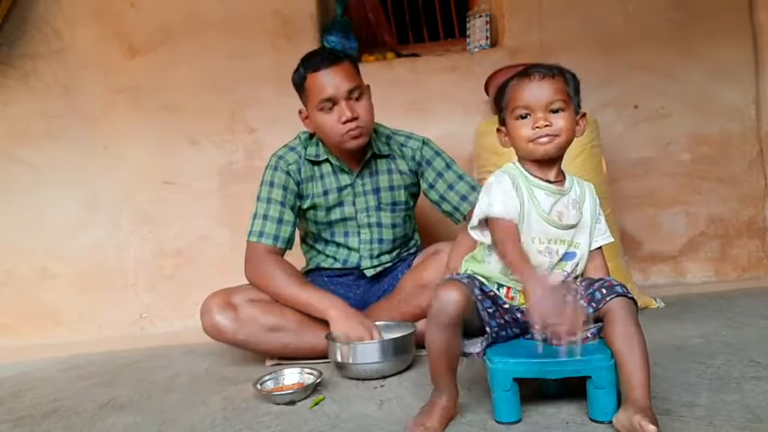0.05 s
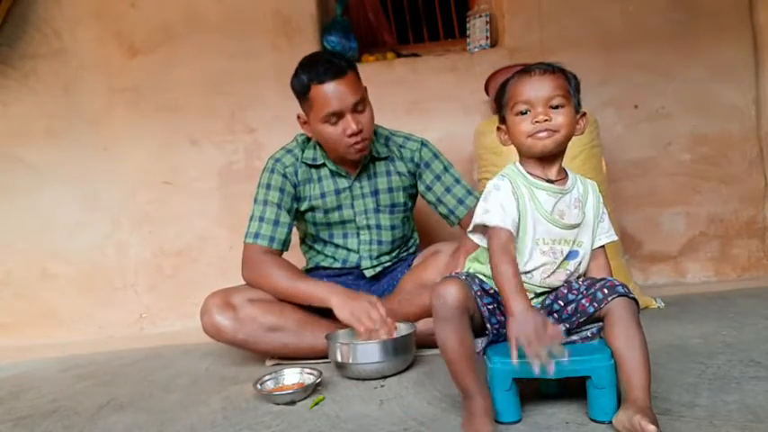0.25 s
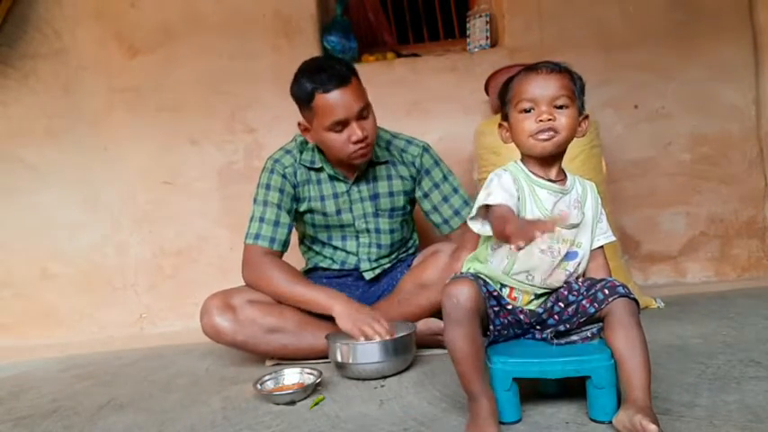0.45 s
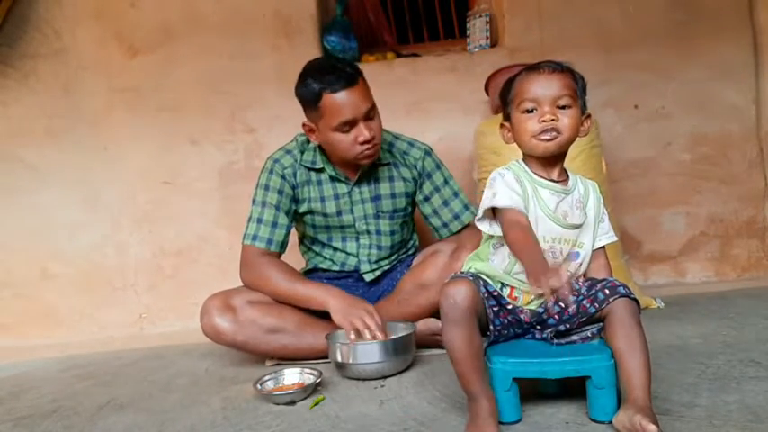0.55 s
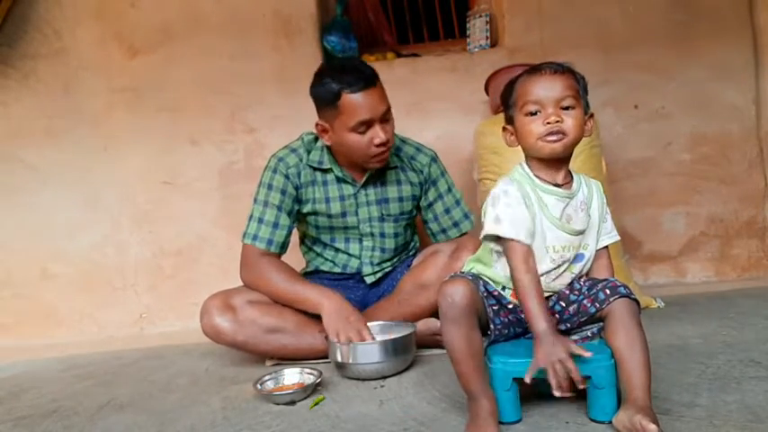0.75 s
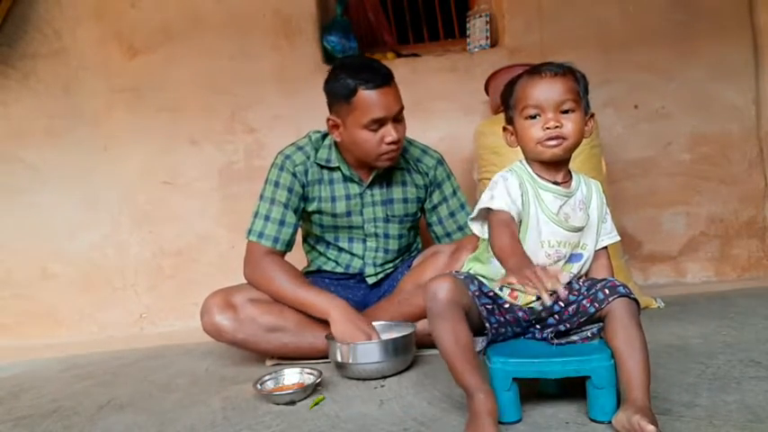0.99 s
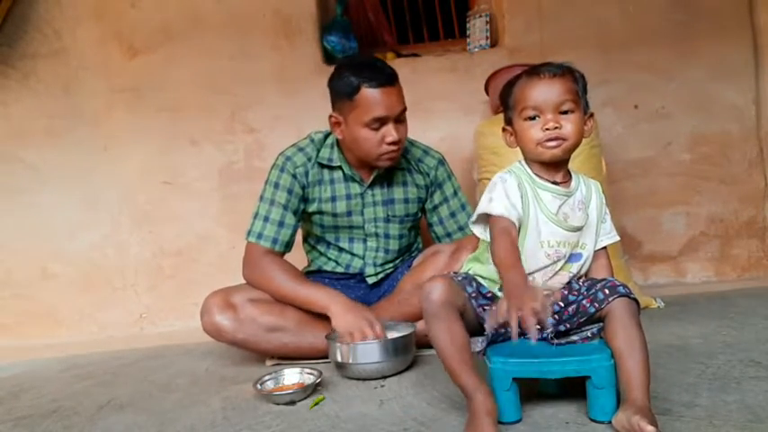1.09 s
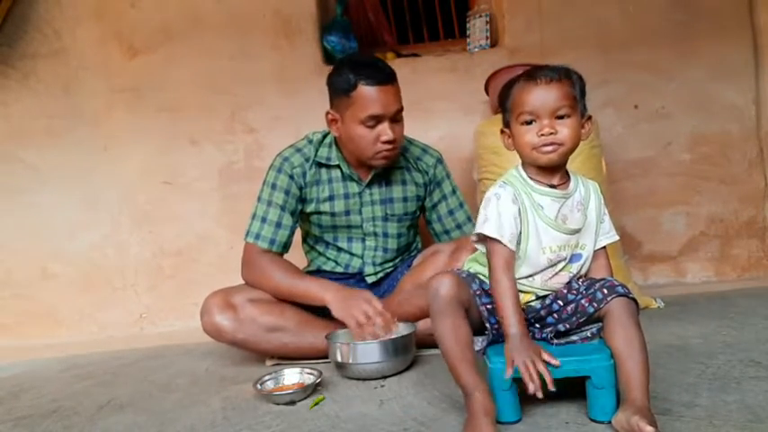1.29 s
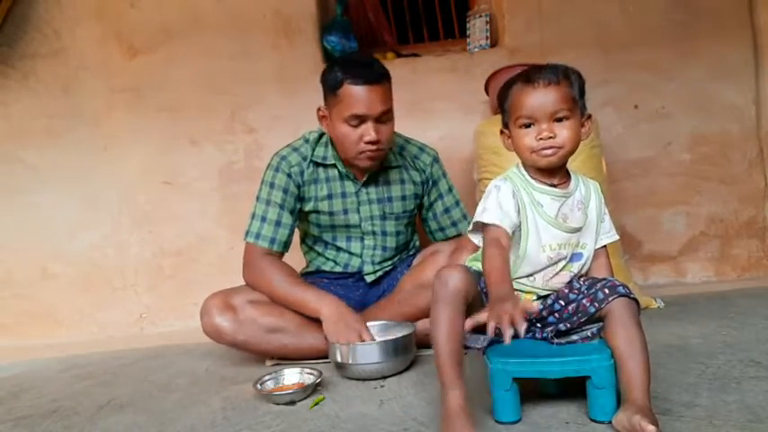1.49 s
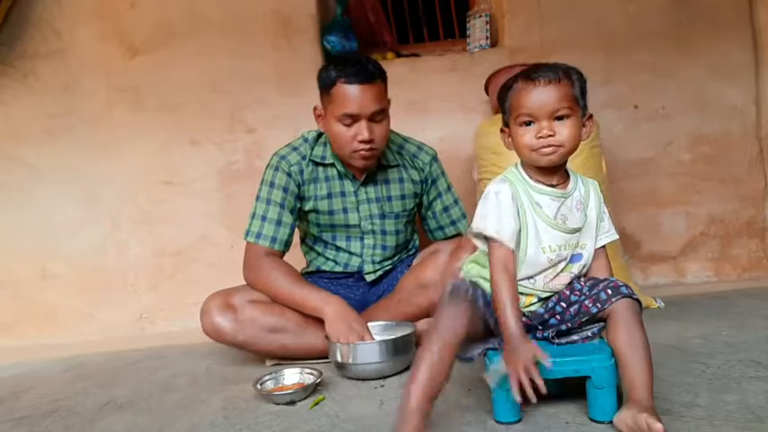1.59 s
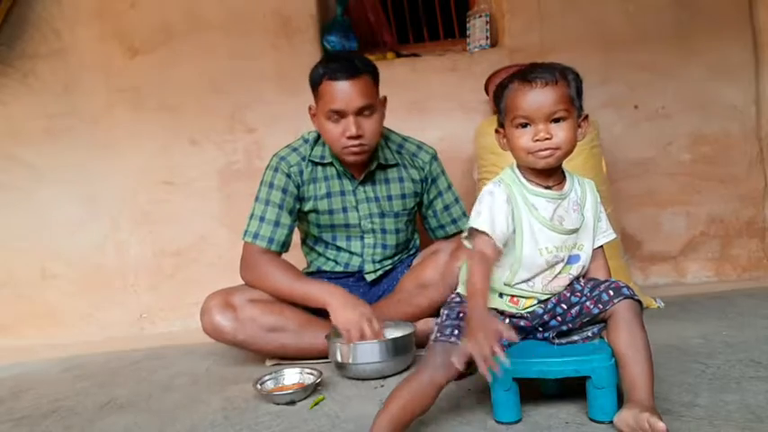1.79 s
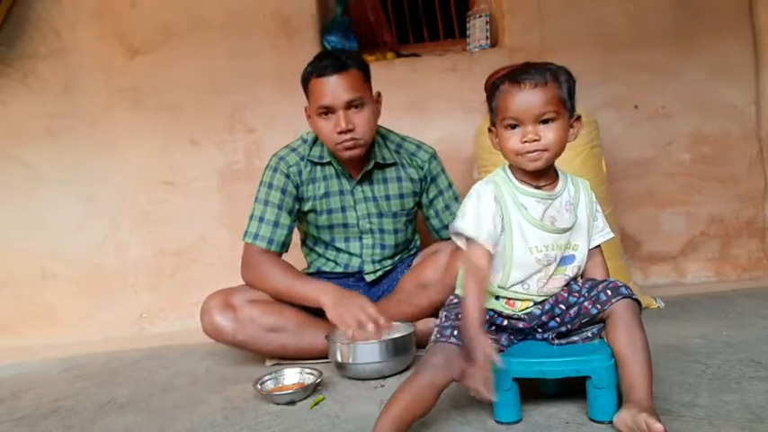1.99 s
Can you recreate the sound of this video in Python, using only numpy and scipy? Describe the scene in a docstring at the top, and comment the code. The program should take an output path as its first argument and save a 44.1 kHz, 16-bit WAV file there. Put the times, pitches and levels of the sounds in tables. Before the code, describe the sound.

Wet rice squishes and rustles as a hand works it in a metal bowl, close by in a quiet room. One sharp, hollow slap comes first, then lighter thumps, ending with a brief hissing wipe and tiny pops.

```python
"""A hand mashes soaked rice in a metal bowl. A dull shuffle leads into a hollow thump with a sharp slap,
and wet grains swish and squelch under the fingers. More thumps follow about twice a second, from the
hand pushing into the bowl or a child patting a plastic stool beside it; grains rustle in between.
Near the end come a quick bright wipe, another shuffle and a few popping air pockets.
Throughout, a bare wall and floor answer briefly over a low room rumble."""
import sys
import numpy as np
from scipy import signal
from scipy.fft import rfft, irfft, next_fast_len
from scipy.io import wavfile

SR = 44100
rng = np.random.default_rng(int(sys.argv[2]) if len(sys.argv) > 2 else 0)


def int16_out(signal):
    """Quantize to a 16-bit WAV file."""
    q = np.round(np.clip(np.atleast_2d(signal).T, -1, 1) * 32767)
    wavfile.write(sys.argv[1], SR, q.astype(np.int16))


N = 90404

# Soft blows. Each row: start in seconds, level in dB, favoured frequency in Hz,
# fall to either side in dB per octave squared, factor on the modes' decay times.
BLOWS = [(0.2453, -24.5, 437, 2, 1), (.779, -34, 500, 2.5, 0.65), (.7905, -31, 510, 5.5, 0.73),
         (1.073, -35, 320, 15.5, 0.7), (1.097, -47, 626, 8.5, 0.89), (1.3213, -28, 338, 1, 1),
         (1.5854, -30.5, 363, 18, 0.59), (1.612, -41.5, 686, 8.5, 0.78), (1.731, -35, 473, 11, 0.72),
         (1.745, -37, 305, -7.5, 0.38), (1.796, -43.5, 196, 3.5, 0.96)]
# Modes of the hollow body. Each row: frequency in Hz, relative level in dB, base t60 in seconds.
BODY_MODES = [(180.8, -20, 0.36), (255.2, 0.5, 0.21), (287, -17, 0.11), (352.8, -4.5, 0.18),
              (393, -12.5, .05), (426.9, 2, 0.11), (476.8, -9.5, .26), (501, -2, 0.13), (543, -4, .165),
              (578.5, -9, 0.13), (653.5, -15.5, 0.13)]
def thumps():
    """Modal vibration: each blow rings the same damped modes, weighted by where it lands."""
    thud_db, thud_hz, thud_t60_s = -16, 104, 0.18
    scatter_db, detune_fraction = 2.05, 0.0035
    attack_s, cutoff_hz, left_lead_s = 0.0025, 740, 0.00018
    out = np.zeros(N)
    t = since(0)[:SR // 2]
    for start, db, centre_hz, fall_db, ring_factor in BLOWS:
        ring = amp(db + thud_db) * fade(t, thud_t60_s) * np.sin(2 * np.pi * thud_hz * t)
        for hz, mode_db, t60 in BODY_MODES:
            scatter, detune = rng.standard_normal(2)
            weight_db = mode_db - fall_db * np.log2(hz / centre_hz) ** 2
            mode = np.sin(2 * np.pi * hz * (1 + detune_fraction * detune) * t)
            ring += amp(db + weight_db + scatter_db * scatter) * fade(t, t60 * ring_factor) * mode
        out += np.pad(ring * rise(t, attack_s) ** 2, (round(start * SR), N))[:N]
    soft = filtered(out, lambda hz: 1 / np.sqrt(1 + (hz / cutoff_hz) ** 20))
    return filtered(soft, lambda hz: np.exp(2j * np.pi * np.outer([.5, -.5], hz) * left_lead_s))


# Skin impacts. Each row: start in seconds, clack level in dB, clack centre in Hz,
# clack half-width in octaves, snap level in dB, snap t60 in seconds.
SKIN_IMPACTS = [(0.2421, -35.5, 1417, .1, -32, 0.02), (0.7764, -52, 1480, 0.62, -53.5, 0.033),
                (0.79, -49, 880, 0.35, -52, 0.045), (1.078, -66.5, 1690, 0.27, -83, 0.11),
                (1.3197, -55, 1300, 0.72, -47.5, 0.041), (1.582, -54, 1570, 0.72, -66, 0.084),
                (1.7306, -47.5, 2000, 1, -45, .02)]
# Spectrum of the snap. Each row: frequency in Hz, relative level in dB.
SNAP_SPECTRUM = [(1000, -66), (2400, -41), (3100, 3.5), (4000, -3.5), (4900, 6.5), (6500, 1.5), (8400, -1),
                 (12000, -9.5), (15500, -23)]
# The snap's own panning. Each row: frequency in Hz, left minus right in dB.
SNAP_PAN = [(2000, -23), (5000, 4.5), (7000, -3), (9000, 1.5), (14000, 7)]
def slaps():
    """Impact noise: brief skin contact excites a broad band, a bright snap and a longer mid clack."""
    attack_s, clack_t60_ratio = 0.00076, 2.37
    out = np.zeros((2, N))
    snap_noise = panned(coloured(noise(), SNAP_SPECTRUM), SNAP_PAN)
    for start, clack_db, clack_hz, octaves, snap_db, t60 in SKIN_IMPACTS:
        t = since(start)
        clack_noise = unit(spread(filtered(noise(), band(clack_hz, octaves))))
        clack = amp(clack_db) * clack_noise * fade(t, t60 * clack_t60_ratio)
        snap = amp(snap_db) * snap_noise * fade(t, t60)
        out += rise(t, attack_s) * (clack + snap)
    return out


# Envelopes of the firm swish and the light rub. Each row: time in seconds, level in dB.
SWISH_ENVELOPE = [(0, -93.5), (.22, -77.5), (.25, -54), (.31, -52.5), (.36, -74.5), (.44, -80.5),
                  (.73, -84), (.76, -64.5), (.80, -62.5), (.85, -74), (1.0, -83), (1.3, -100),
                  (1.33, -61.5), (1.40, -72), (1.5, -87.5), (1.6, -73), (1.70, -74), (1.74, -56),
                  (1.78, -58.5), (1.815, -66.5), (1.855, -67.5), (1.91, -89.5), (2.05, -81)]
RUB_ENVELOPE = [(0, -74), (.05, -79), (.14, -88.5), (.23, -65.5), (.36, -64.5), (.45, -81), (.54, -66.5),
                (.6, -78), (.72, -75), (.92, -69.5), (1.08, -76), (1.2, -88.5), (1.5, -88), (1.58, -69.5),
                (1.69, -68.5), (1.82, -66), (1.9, -81), (1.98, -103.5), (2.02, -77)]
# Their spectra. Each row: frequency in Hz, relative level in dB.
SWISH_SPECTRUM = [(400, 0.5), (800, 1.5), (1500, 2.5), (2300, 2), (3200, 4.5), (5700, -6.5), (8500, -6),
                  (13700, -10.5), (15500, -18)]
RUB_SPECTRUM = [(1000, -28), (3800, -15), (5200, -6.5), (7200, -3.5), (8500, 2), (10000, -8.5), (13000, -7),
                (15500, -25)]
def stirring():
    """Granular friction: tiny slips sum to a coarse swish under pressure and a fine hiss in between."""
    swish = level(SWISH_ENVELOPE) * coloured(grains(per_s=4000), SWISH_SPECTRUM)
    rub = level(RUB_ENVELOPE) * coloured(grains(per_s=15000), RUB_SPECTRUM)
    return swish + rub


# Wet clumps parting. Each row: start in seconds, level in dB, length in seconds, centre in Hz.
PARTING_CLUMPS = [(0.256, -71, 0.016, 2800), (.291, -51, 0.018, 4700), (0.341, -56.5, 0.0076, 2160),
                  (0.499, -59, 0.01, 8300), (0.518, -59.5, .008, 7100), (0.737, -62, .005, 9900),
                  (0.7434, -51.5, 0.009, 8300), (0.751, -56, 0.029, 3750), (0.845, -62, 0.0057, 7600),
                  (1.324, -67, 0.022, 3680), (1.609, -63, 0.024, 2390), (1.821, -54, 0.014, 3520),
                  (1.84, -57.5, 0.017, 8200), (1.844, -54.5, 0.011, 4200)]
def squelches():
    """Capillary adhesion gives way: wet grains part in short crackling bursts."""
    out = np.zeros((2, N))
    for start, db, length, centre_hz in PARTING_CLUMPS:
        age = np.e * since(start) / length  # the burst peaks at age 1
        crackle = unit(filtered(grains(per_s=2500), band(centre_hz, octaves=0.74)))
        out += amp(db) * age * np.exp(1 - age) * crackle
    return out


# Air pockets in the rice. Each row: start in seconds, level in dB, frequency in Hz.
AIR_POCKETS = [(0.756, -48.5, 1490), (1.839, -54, 1840), (1.848, -43.5, 1510), (1.868, -62, 1130)]
def pops():
    """Cavity resonance: each air pocket rings as a damped sine when it opens."""
    out = np.zeros(N)
    for start, db, hz in AIR_POCKETS:
        t = since(start)
        out += amp(db) * np.sin(2 * np.pi * hz * t) * fade(t, t60=0.019) * rise(t, attack_s=0.00084)
    return out


# Spectrum of the wipe. Each row: frequency in Hz, relative level in dB.
WIPE_SPECTRUM = [(1500, -34), (3200, 2), (5500, -6), (7000, 0.5), (10000, -0.5), (13700, -2), (15500, -17)]
def wipe():
    """Sliding friction: one fast stroke of the hand hisses abruptly, holds and lets go."""
    start_s, attack_s, hold_s, level_db = 1.706, 0.012, 0.072, -56
    onset = np.minimum(since(start_s) / attack_s, 1)
    release = fade(since(start_s + attack_s + hold_s), t60=0.1)
    return amp(level_db) * onset * release * coloured(grains(per_s=4000), WIPE_SPECTRUM)


# Envelope of the hand's drag. Each row: time in seconds, level in dB.
DRAG_ENVELOPE = [(0, -77), (.07, -67), (.115, -56), (.165, -59), (.21, -64.5), (.3, -93), (1.6, -75.5),
                 (1.68, -63), (1.81, -49), (1.87, -79.5), (2.0, -85)]
# Its spectrum. Each row: frequency in Hz, relative level in dB.
DRAG_SPECTRUM = [(70, -20), (130, -2.5), (190, -4.5), (270, -2.5), (400, -13.5), (650, -31), (1200, -70),
                 (4000, -83)]
def shuffle():
    """Friction at a soft contact: the hand drags along the bowl and makes dull, low noise."""
    return level(DRAG_ENVELOPE) * coloured(noise(), DRAG_SPECTRUM)


# Reverberation times. Each row: frequency in Hz, t60 in seconds.
ROOM_T60 = [(100, 0.21), (400, 0.24), (1500, 0.26), (5000, 0.23), (14000, 0.06)]
def reverberation(x):
    """Diffuse reflection: wall and floor return a short tail, each frequency absorbed at its own rate."""
    delay_s = 0.008
    hz, t, spectra = signal.stft(spread(rng.standard_normal((2, SR // 2))), SR, nperseg=256)
    _, tail = signal.istft(spectra * fade(t, along(ROOM_T60, hz)[:, None]), SR, nperseg=256)
    response = np.pad(tail / np.linalg.norm(tail[0]), ((0, 0), (round(delay_s * SR), 0)))
    return signal.fftconvolve(x, response, axes=1)[:, :N]


# Spectrum of the room's background. Each row: frequency in Hz, relative level in dB.
RUMBLE_SPECTRUM = [(20, -31.5), (45, -6), (70, -1), (110, 1), (150, -8), (250, -10), (400, -16.5),
                   (700, -24.5), (1500, -30), (4000, -36), (9000, -36), (15500, -35)]
def rumble():
    """Stationary noise: a faint floor with most of its energy in the bass."""
    return amp(-68.5) * coloured(noise(), RUMBLE_SPECTRUM)


def amp(db):
    """Decibels to gain."""
    return 10 ** (np.asarray(db) / 20)


def unit(x):
    """Normalisation to rms 1."""
    return x / np.sqrt(np.mean(x ** 2) + 1e-20)


def along(points, hz):
    """Interpolation of (Hz, value) points on a log axis."""
    point_hz, values = np.transpose(points)
    return np.interp(np.log(hz + 1), np.log(point_hz + 1), values)


def since(start):
    """Seconds since the start at every sample, zero before it."""
    return np.maximum(np.arange(N) / SR - start, 0)


def level(envelope):
    """Gain per sample from (s, dB) points."""
    return amp(np.interp(since(0), *np.transpose(envelope)))


def rise(t, attack_s):
    """Exponential approach to 1."""
    return 1 - np.exp(-t / attack_s)


def fade(t, t60):
    """Exponential decay by 60 dB in t60 seconds."""
    return np.exp(-np.log(1000) * t / t60)


def noise():
    """Two independent white noises."""
    return rng.standard_normal((2, N))


def grains(per_s):
    """Shot noise: clicks of random size at random moments."""
    return noise() * (rng.random(N) < per_s / SR)


def band(centre_hz, octaves):
    """Band-pass response, falling to half gain the given octaves to either side."""
    return lambda hz: 1 / (1 + (np.log2((hz + 1) / centre_hz) / octaves) ** 2)


def filtered(x, response):
    """Linear filtering: the spectrum times a frequency response."""
    n = x.shape[-1]
    padded = next_fast_len(n + SR // 2)
    return irfft(rfft(x, padded) * response(np.fft.rfftfreq(padded, 1 / SR)), padded)[..., :n]


# Likeness of left and right. Each row: frequency in Hz, correlation from -1 to 1.
STEREO_CORRELATION = [(25, .6), (100, 0.76), (300, 0.75), (600, 0.23), (1300, 0.42), (2500, -0.18),
                      (5000, -0.0097), (12000, 0.1)]
def spread(pair):
    """Partial coherence: two unrelated signals mix as mid and side, most alike in the bass."""
    def weights(hz):
        angle = np.arccos(np.clip(along(STEREO_CORRELATION, hz), -1, 1)) / 2
        return np.array([np.cos(angle), np.sin(angle)])
    mid, side = filtered(pair, weights)
    return np.array([mid + side, mid - side])


def coloured(pair, spectrum):
    """Spectral shaping into a stereo texture of rms 1."""
    return unit(spread(filtered(pair, lambda hz: amp(along(spectrum, hz)))))


def panned(x, balance):
    """A level difference leans each frequency to one side."""
    return filtered(x, lambda hz: amp(np.outer([.5, -.5], along(balance, hz))))


# Panning of all but the rumble. Each row: frequency in Hz, left minus right in dB.
SCENE_PAN = [(100, 0.5), (300, 0.6), (550, -2), (1400, 0), (3000, -0.5), (5000, -4.5), (9000, 2),
             (14000, 11)]
def scene():
    """Superposition: direct sound and its reflections add over the rumble."""
    reflected_db = -12
    direct = thumps() + shuffle() + slaps() + squelches() + pops() + stirring() + wipe()
    reflected = amp(reflected_db) * reverberation(direct)
    return panned(direct + reflected, SCENE_PAN) + rumble()


def record(dry):
    """Band limiting: the microphone passes nothing above its top frequency."""
    top_hz = 15800
    return filtered(dry, lambda hz: hz < top_hz)


dry = scene()
out = record(dry)
int16_out(out)
```